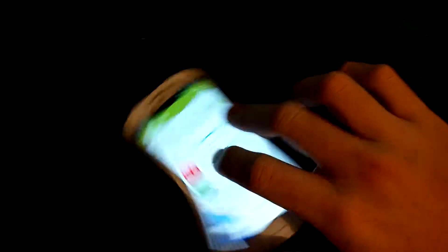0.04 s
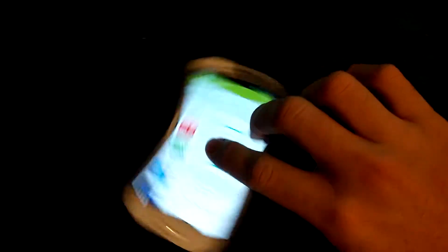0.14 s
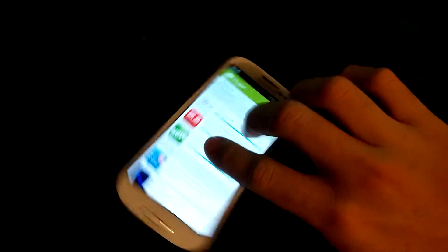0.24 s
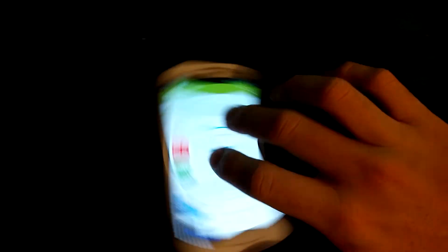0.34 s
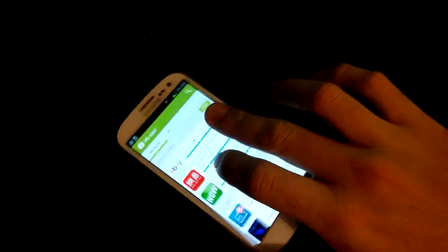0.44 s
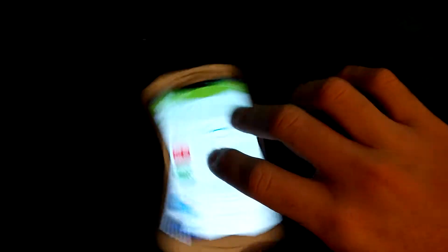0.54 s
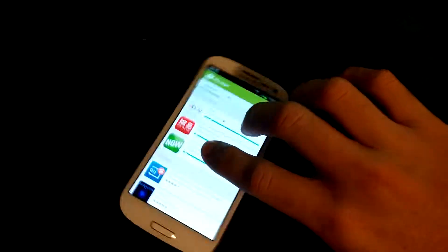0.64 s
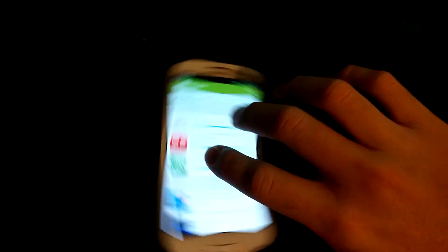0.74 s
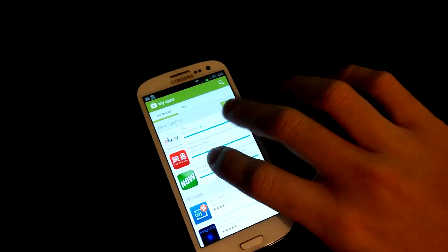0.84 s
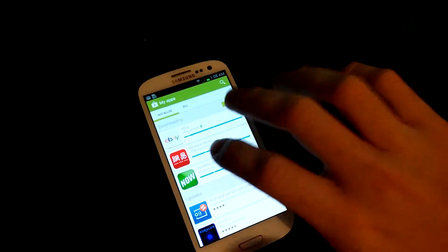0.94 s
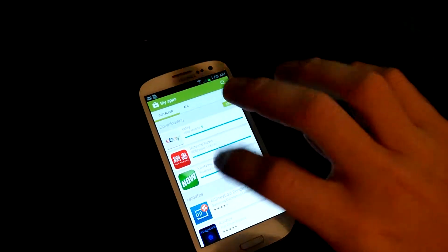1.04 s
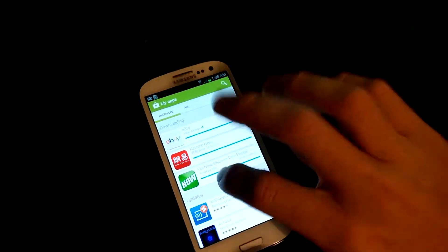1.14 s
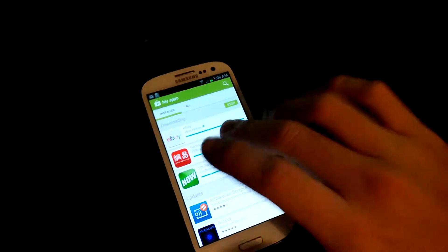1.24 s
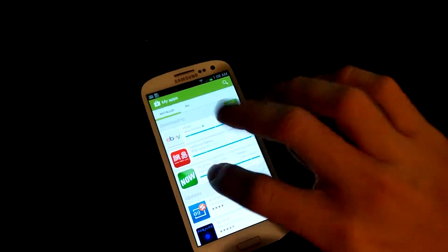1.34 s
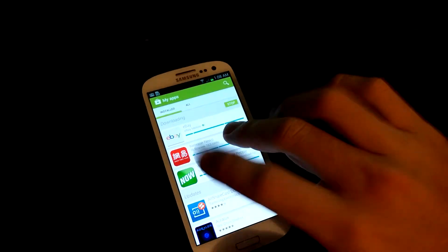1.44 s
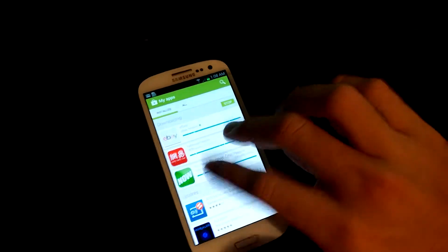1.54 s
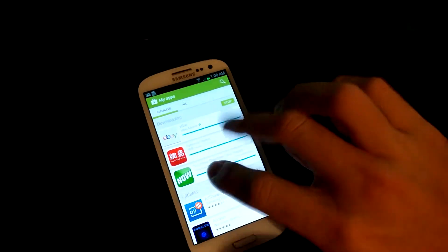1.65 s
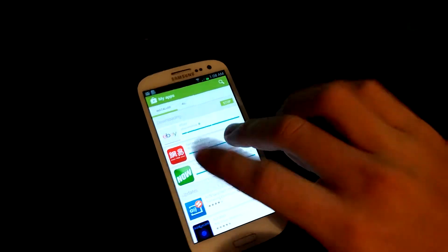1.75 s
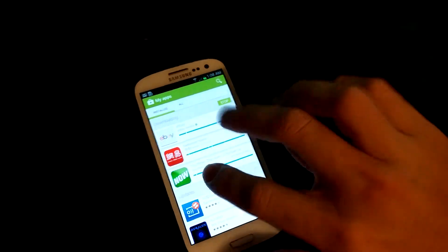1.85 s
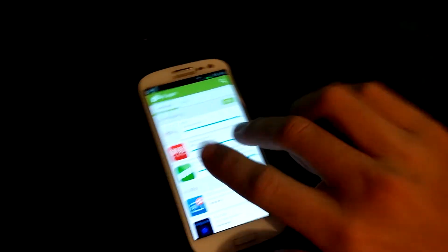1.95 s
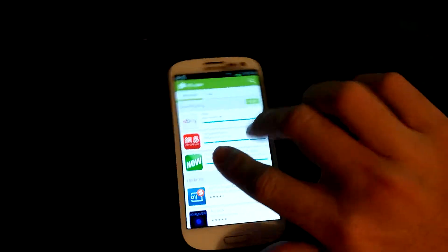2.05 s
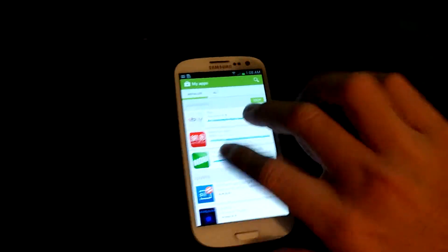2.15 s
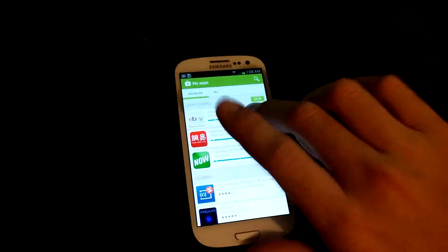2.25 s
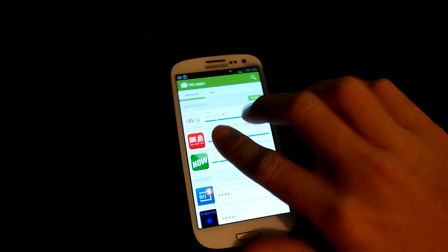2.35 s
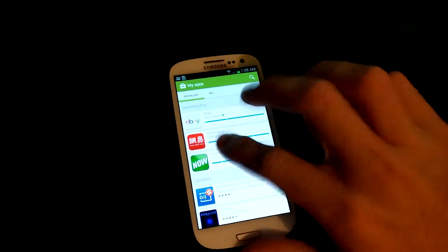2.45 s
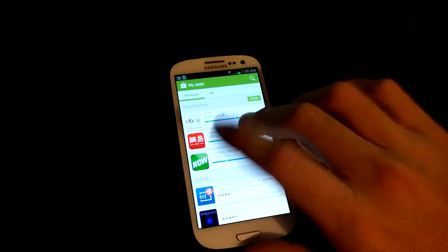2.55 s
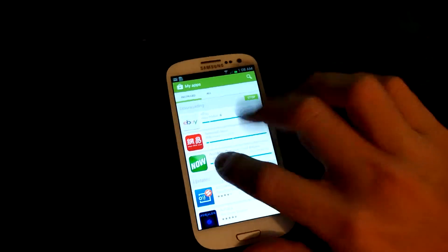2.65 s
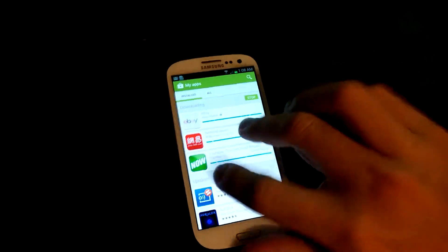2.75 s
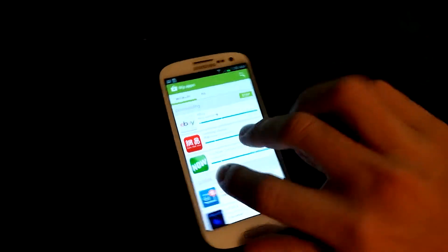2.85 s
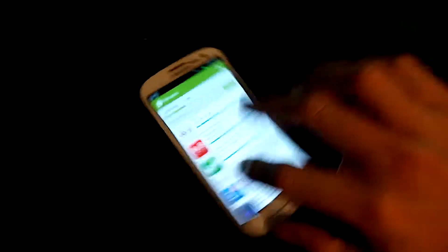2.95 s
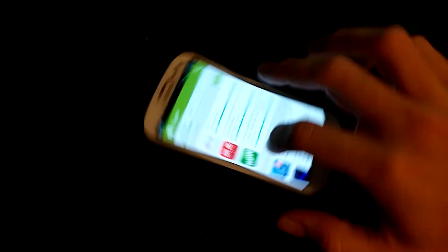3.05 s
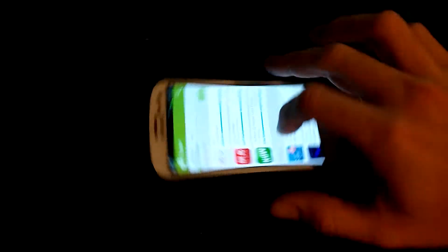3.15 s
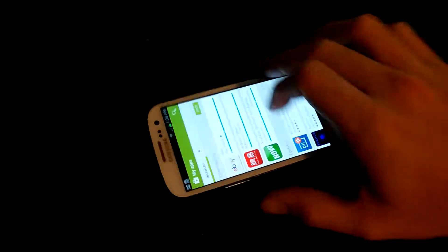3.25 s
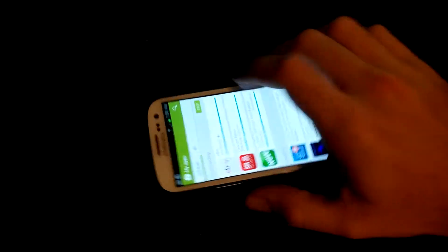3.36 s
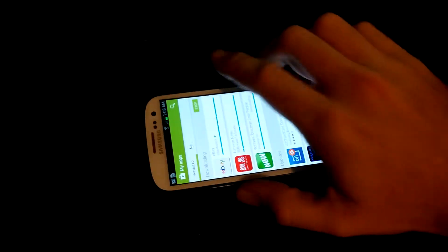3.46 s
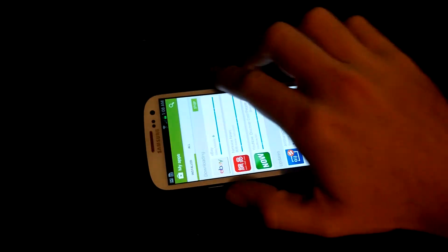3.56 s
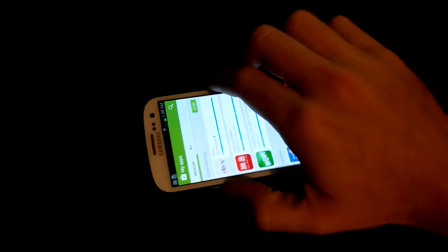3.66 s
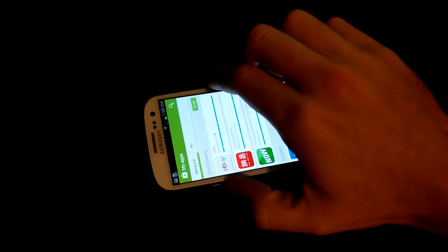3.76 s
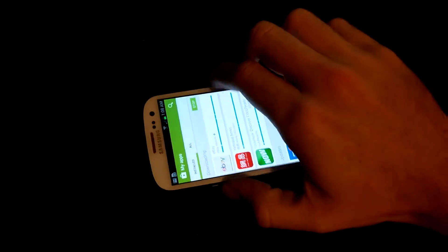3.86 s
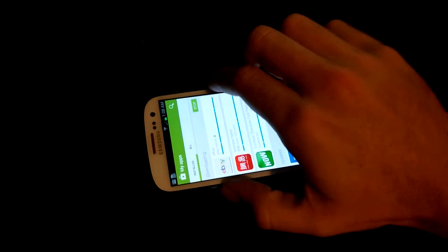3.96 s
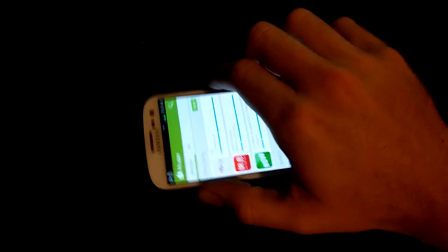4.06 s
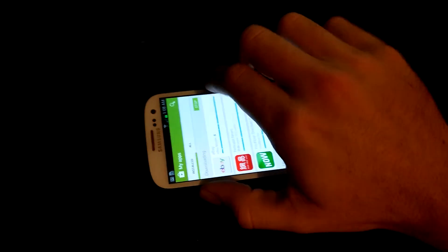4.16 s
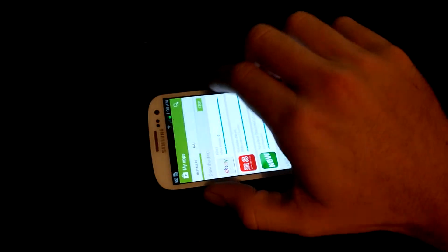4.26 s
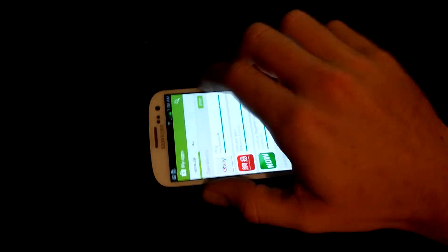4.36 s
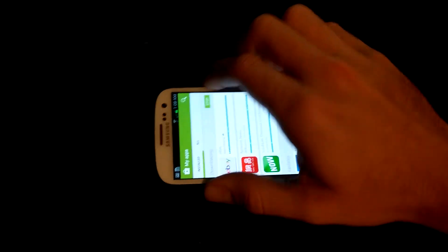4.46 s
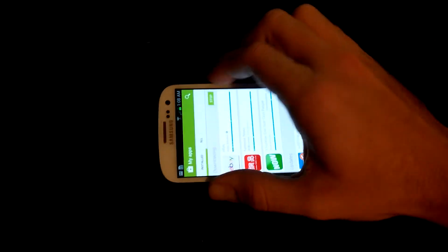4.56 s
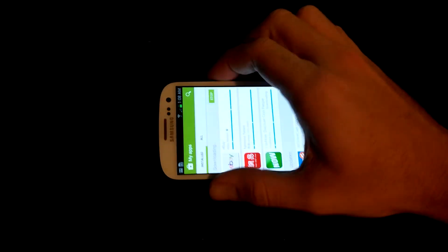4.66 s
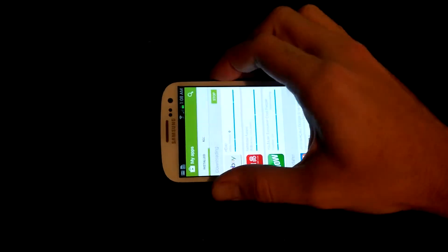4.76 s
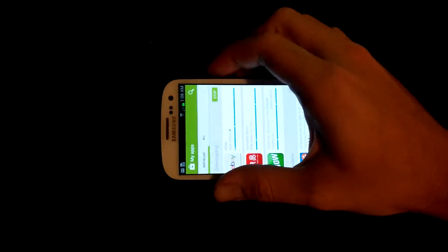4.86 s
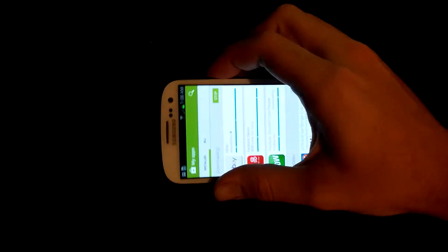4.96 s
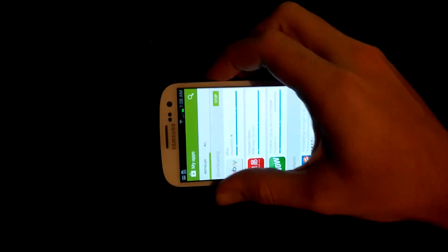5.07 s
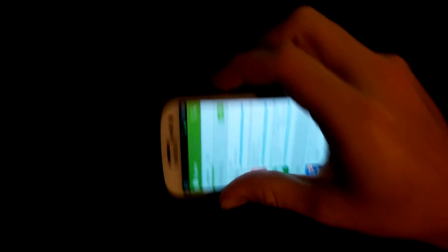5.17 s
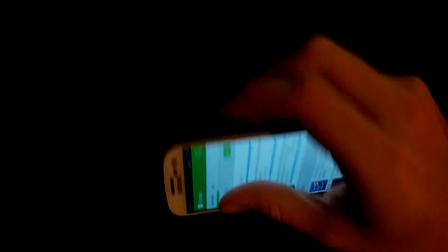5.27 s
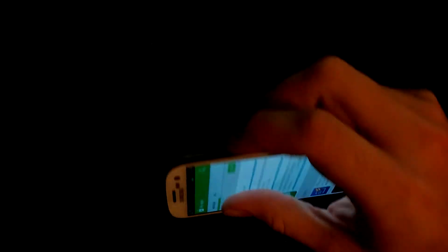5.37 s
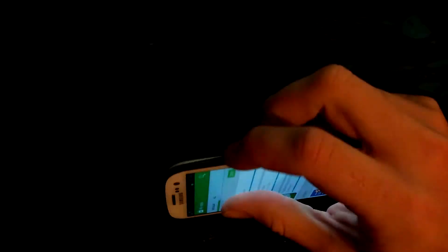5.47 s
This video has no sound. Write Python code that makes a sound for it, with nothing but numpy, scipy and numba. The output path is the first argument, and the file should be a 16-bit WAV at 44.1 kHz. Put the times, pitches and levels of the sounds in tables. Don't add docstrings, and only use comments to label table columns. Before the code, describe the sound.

Soft low bumps, then a burst of booming finger drumming with sharp nail cracks on glass, then quiet ticks and scrapes of a handled phone.

```python
import sys
import numpy as np
from scipy import signal
from scipy.fft import rfft, irfft
from scipy.io import wavfile
from scipy.ndimage import uniform_filter1d
from numba import njit

SR = 44100
rng = np.random.default_rng(int(sys.argv[2]) if len(sys.argv) > 2 else 0)


def level_to_linear(level):
    exponent = np.asarray(level, float) / 20
    return 10 ** exponent


def generate_wav(signal):
    frames = np.transpose(np.atleast_2d(signal))
    scaled = np.clip(frames, -1, 1) * 32767
    pcm = np.round(scaled).astype(np.int16)
    wavfile.write(sys.argv[1], SR, pcm)


N = 243873

# f/Hz, density [dB per Hz]
AIR_SPECTRUM = [(35, -38), (60, -17.5), (139, -10), (272, -10), (521, -20.5), (756, -18), (849, -19),
                (1350, -26), (2310, -32.5), (15500, -40.5)]
# f/Hz, width/Hz, level/dB
FAN_HUMPS = [(255, 40, 5), (357, 42, 6), (500, 27, 2.5), (740, 56, 1.5), (1160, 12, 5.5), (2400, 730, 5.5),
             (11200, 300, -1.5)]
# t/s, level/dB
RUMBLE = [
    (0.0, -36.5),
    (0.94, -47),
    (1.48, -34),
    (2.58, -51),
    (2.859, -27.5),
    (3.2, -92.5),
]
# t/s, length/s, peak level/dB, f/Hz, width/Hz
RUBS = [(.125, 0.11, -55.5, 950, 199), (0.119, 0.12, -55.5, 290, 120), (0.383, 0.036, -58, 720, 200),
        (0.528, .04, -54.5, 800, 250), (0.592, 0.068, -56, 870, 300), (0.691, 0.029, -58, 420, 250),
        (0.723, 0.064, -52.5, 450, 200), (0.878, 0.061, -54.5, 740, 120), (0.954, 0.07, -57, 655, 303),
        (1.017, 0.053, -51.5, 520, 300), (1.128, 0.12, -57.5, 765, 198), (1.421, 0.068, -61.5, 2780, 302),
        (1.569, 0.02, -41, 1400, 400), (1.629, 0.049, -63.5, 2500, 250), (1.824, 0.049, -49.5, 930, 152),
        (1.811, .05, -54, 2780, 250), (2.029, 0.027, -56, 850, 200), (2.093, 0.067, -54.5, 740, 100),
        (2.593, 0.087, -69, 2620, 500), (2.85, 0.05, -43.5, 642, 120), (2.852, 0.03, -33.5, 440, 150),
        (2.899, 0.093, -63, 2700, 500), (4.488, 0.12, -69, 1300, 706), (4.702, 0.073, -70.5, 2020, 900),
        (4.979, 0.13, -64.5, 2190, 704), (5.236, 0.15, -60.5, 1610, 500), (5.303, 0.085, -58, 5450, 910),
        (5.43, 0.15, -67.5, 2280, 393), (5.501, 0.015, -48, 3400, 453), (4.696, 0.0084, -60, 1980, 1400),
        (2.204, 0.16, -56.5, 434, 118), (4.692, .12, -59.5, 432, 200), (2.485, 0.1, -62, 900, 900),
        (0.128, .06, -65, 3050, 350), (.135, 0.079, -56.5, 4260, 400), (0.193, .1, -60, 600, 500),
        (0.301, 0.059, -69, 805, 500), (0.657, .04, -68, 700, 600), (0.741, .06, -68, 2000, 900),
        (.8, 0.078, -69, 500, 400), (5.342, 0.038, -49, 330, 120), (4.084, 0.034, -56, 300, 119),
        (1.28, 0.042, -48, 5700, 2500)]
# t/s, length/s, peak level/dB, low f/Hz, high f/Hz
SCRAPES = [
    (0.123, 0.11, -45.5, 2920, 4300),
    (0.47, 0.058, -48.5, 2890, 4740),
    (0.583, 0.098, -45.5, 2910, 4300),
    (1.273, 0.035, -41.5, 2750, 5500),
    (3.926, 0.03, -36.5, 2340, 5160),
    (4.145, 0.12, -58.5, 2300, 4940),
    (4.5, 0.062, -51, 2200, 4700),
    (4.782, 0.026, -54, 2580, 4700),
    (5.293, 0.13, -50.5, 2300, 5770),
]
# t/s, peak level/dB, f/Hz
SNAPS = [
    (1.29, -33.5, 7960),
    (1.3928, -42.5, 12100),
    (1.576, -45.5, 9000),
    (1.7313, -42, 9000),
    (1.902, -43.5, 8950),
    (1.9754, -44.5, 8000),
    (2.2397, -32, 8000),
    (2.253, -45.5, 8000),
    (2.6825, -44.5, 7920),
    (2.848, -41, 8080),
]
# t/s, peak level/dB, f/Hz, knock level/dB
ROLL = [(1.1947, -62.5, 2530, -8.5), (1.282, -43, 2605, -27.5), (1.2899, -13, 2700, -17.5),
        (1.3004, -28, 2250, -17), (1.3931, -25, 2940, -7.5), (1.3992, -36, 1960, -3),
        (1.4074, -40, 1820, 1.5), (1.474, -34, 2770, -13.5), (1.491, -32, 2000, -20),
        (1.576, -34, 2190, -2), (1.6444, -41, 1830, -6), (1.7313, -31.5, 4030, -0.5),
        (1.7374, -33.5, 2400, -22.5), (1.8208, -32.5, 2540, -18.5), (1.8494, -39, 2840, -3),
        (1.9024, -32, 2520, -6), (1.9066, -31.5, 1730, -29), (1.9244, -32.5, 1920, -16),
        (1.9744, -26.5, 2500, -24), (1.9844, -32.5, 2140, -7.5), (2.0393, -40.5, 3000, -1.5),
        (2.0767, -38.5, 4860, -23)]
# t/s, peak level/dB, f/Hz, knock level/dB
RAPS = [(2.24, -15.5, 2240, -8), (2.2446, -28.5, 3350, -23), (2.2552, -18, 2180, -14.5),
        (2.268, -28, 3250, -3), (2.283, -33, 2230, -9.5), (2.2931, -55.5, 2440, -7), (2.395, -36, 4300, -8),
        (2.591, -34.5, 2230, -3.5), (2.683, -28, 2070, -3.5), (2.688, -43.5, 1790, 6.5),
        (2.701, -36.5, 2120, -23.5), (2.723, -51, 2500, -22.5), (2.765, -31, 2600, -14),
        (2.772, -32.5, 1880, -21.5), (2.779, -33.5, 2090, -11.5), (2.7917, -34.5, 2950, -21.5),
        (2.848, -23.5, 1700, -31.5), (2.8514, -18.5, 1560, -4), (2.8677, -23.5, 2685, -20),
        (2.8818, -34.5, 2080, -18), (2.8944, -40.5, 2720, -6), (2.998, -39, 2700, -17)]
# t/s, peak level/dB, f/Hz, knock level/dB
TICKS = [(3.7354, -27, 2330, -22), (3.8663, -31, 2000, -51), (3.936, -31, 2270, -30),
         (3.9530, -30, 2450, -45), (4.0553, -29.5, 2100, -20), (4.149, -37, 4500, -26),
         (4.1884, -59, 2150, 11), (4.69, -40.5, 1860, -19), (4.788, -29, 4130, -42),
         (5.0305, -39, 4000, -11.5), (5.354, -36.5, 2320, -21), (0.128, -44, 2800, -10),
         (0.589, -39, 2760, -7), (1.026, -57, 1790, 1), (5.166, -61, 1500, 10), (5.428, -51, 1576, 5),
         (4.5086, -56, 2240, -17), (4.5226, -45, 4600, -4), (4.7286, -54, 1500, -4),
         (4.755, -67, 3170, -25), (4.984, -56.5, 1400, -6), (4.995, -48, 1880, -3.5),
         (5.3182, -43, 2150, -11),
         (3.931, -31, 6300, -29),
    (3.9395, -39, 2700, -16),
    (3.944, -38, 4900, -25),
    (4.690, -36, 2300, -17),
    (4.695, -43, 1540, -13),
    (4.091, -44, 2200, -13),
    (3.9528, -26, 2500, -30),
    (3.966, -39, 2900, -20),
    (2.7575, -41, 3000, -20),
]
# f/Hz, width/Hz, level/dB
CASE_MODES = [(960, 62, 10.5), (1400, 110, 15), (2130, 210, 4), (2750, 170, -9), (3250, 400, -42),
              (4300, 3000, 0.5)]
# f/Hz, level/dB, ring t60/s
TABLE_MODES = [(58.1, -4.5, 1), (77.4, 2.5, 0.11), (97.1, 1, 0.11), (135.55, -4.5, 0.19),
               (185.5, -3.5, 0.11), (214.2, -0.5, 0.19), (226, -2.5, 0.1), (256.9, -9, 0.14),
               (291.1, -6, 0.1), (367.5, -15.5, 0.089), (428.4, -7.5, 0.085), (647, -16, 0.071)]
# t/s, peak level/dB, boom f/Hz, ring t60/s, upper modes level/dB
LEANS = [
    (2.1, -32.5, 63.2, 0.16, 5),
    (2.419, -37, 60.4, 0.43, -6),
    (2.692, -34, 70, 0.18, -12),
    (2.86, -20.5, 70.7, 0.16, -14),
    (3.529, -81.5, 89.6, .2, -1),
    (4.43, -55, 62.4, 0.11, 17),
    (4.499, -47, 61.6, 0.22, -7),
    (5.166, -66, 72, 0.055, 9),
    (5.322, -52, 66.4, 0.2, -13),
]
# t/s, peak level/dB, boom f/Hz, ring t60/s, upper modes
# level/dB
MORE_THUDS = [(1.391, -19, 122, .05, 1), (1.1, -21, 170, .12, 7.5), (2.755, -19.5, 120, 0.078, 3.5),
              (2.79, -21, 122, 0.083, -6.5), (3.058, -32.5, 118, 0.061, 5), (3.17, -45.5, 136, 0.12, 4),
              (2.15, -35.5, 137.4, 0.106, 3), (4.468, -44, 80, 0.05, -13), (.378, -42.5, 136, 0.051, 1),
              (4.885, -57, 92, 0.048, 4), (.893, -37, 140, 0.043, 6), (.918, -41.5, 80, 0.082, -7),
              (1.025, -41, 110, .09, 4.5), (4.535, -39.5, 89, 0.058, 1), (1.4, -20, 110, 0.086, 4)]
# t/s, peak level/dB, boom f/Hz, ring t60/s, upper modes level/dB
TURNS = [(0.004, -44, 121, 0.072, 5.5), (.039, -53, 123.4, 0.16, 2), (0.073, -36.5, 120.2, 0.13, 0),
         (0.118, -36.5, 93.6, 0.25, 2), (.181, -45.5, 118.5, 0.075, 10), (.247, -41.5, 120, 0.089, 3),
         (0.281, -36, 127, 0.099, -1.5), (0.314, -32.5, 111.5, 0.11, -14), (0.376, -53, 125.7, 0.12, -3),
         (0.459, -39, 119.8, 0.08, -7), (0.532, -41, 96, 0.037, 7.5), (0.585, -38.5, 128, 0.16, -6),
         (0.612, -41, 108, 0.11, -5), (.689, -44.5, 132.2, 0.14, 9.5), (0.721, -40, 122.9, 0.19, 1),
         (0.76, -48, 112, 0.041, 1), (0.818, -50, 110, 0.32, 6), (.869, -35, 132.3, 0.14, -4),
         (0.955, -36.5, 130.9, 0.24, 4.5), (1.015, -39.5, 121.8, .21, 4), (1.114, -36, 116, 0.13, -2),
         (1.147, -37, 117.3, 0.15, 0)]
# t/s, peak level/dB, boom f/Hz, ring t60/s, upper modes level/dB
DRUMS = [(1.196, -21.5, 112.4, 0.2, -10.5), (1.281, -8.5, 116, 0.089, 2.5),
         (1.341, -25.5, 122.4, 0.078, 8.5), (1.399, -8, 122.6, 0.11, -2), (1.48, -13.5, 112, 0.06, 0.5),
         (1.577, -10, 122.7, 0.13, -3.5), (1.596, -18, 123, 0.082, -6), (1.645, -21.5, 121, 0.18, -3),
         (1.737, -10, 118.6, 0.11, 2.5), (1.822, -13, 119, 0.07, -2.5), (1.847, -19.5, 124, 0.068, 2.5),
         (1.907, -12, 123, 0.077, 1.5), (1.931, -18, 127.5, 0.097, -4.5), (1.975, -10.5, 123, 0.093, -7),
         (2.015, -21.5, 128, 0.09, -3), (2.043, -22.5, 140.4, 0.11, 6), (2.235, -15.5, 111.2, 0.17, 6),
         (2.258, -13.5, 124.3, 0.12, -6.5), (2.278, -16.5, 120.2, 0.089, -3), (2.4, -24, 125.7, 0.11, 0),
         (2.588, -15, 127, 0.1, -0.5), (2.685, -10, 107.8, 0.074, 0.5), (2.714, -24.5, 121, 0.095, 3),
         (2.763, -13, 120.5, .17, -4.5), (2.852, -7.5, 126.5, 0.11, 1), (2.874, -12, 133, 0.091, 2),
         (2.909, -21.5, 131.3, 0.16, -4), (2.993, -23.5, 114, 0.13, 5.5), (3.125, -40.5, 139.7, 0.28, -1)]
# t/s, peak level/dB, boom f/Hz, ring t60/s, upper modes level/dB
REACHES = [(3.336, -46, 137.8, 0.06, -1.5), (3.409, -59.5, 121, 0.075, 1), (3.575, -57.5, 120.5, 0.063, -9),
           (3.685, -52, 117.8, 0.041, 3), (3.734, -42, 98.6, 0.28, 14.5), (3.774, -49, 128, 0.079, 0),
           (3.859, -52.5, 112.3, 0.14, 1), (3.936, -39.5, 123.4, 0.43, 0), (3.99, -46, 124, 0.075, 14),
           (4.078, -36, 124.7, 0.093, 6.5), (4.140, -34, 100, 0.32, -6.5), (4.196, -34, 104.7, 0.16, -9.5),
           (4.269, -66, 141, 0.14, 1)]
# t/s, peak level/dB, boom f/Hz, ring t60/s, upper modes level/dB
GRIPS = [(4.342, -54, 111.8, 0.13, 8), (4.441, -58, 111.4, 0.05, 12), (4.477, -35.5, 71, 0.16, -3),
         (4.529, -41, 77, 0.18, 2), (4.57, -47.5, 115.5, 0.087, 0), (4.626, -66, 101.4, 0.048, 8),
         (4.689, -56.5, 106, 0.084, -3), (4.722, -46.5, 127.8, 0.29, 1), (4.792, -41.5, 128.5, 0.12, 14),
         (4.876, -52, 161, 0.075, 10), (4.947, -59, 123, 0.12, -1), (4.98, -39, 140.6, 0.22, -0.5),
         (5.054, -53.5, 85.5, 0.12, 2), (5.102, -38.5, 129.3, 0.088, 3), (5.154, -53, 160, 0.36, 4),
         (5.241, -40, 128.6, 0.18, 2), (5.296, -50.5, 152, 0.13, 2), (5.34, -40, 123, 0.3, -6.5),
         (5.424, -35, 94.7, 0.36, 0.5), (5.468, -42.5, 112.6, 0.32, -3.5)]
# f/Hz, lost below level/dB, lost above level/dB
LOST_BANDS = [(13000, -66, -14), (13700, -60, -20), (14300, -55, -26), (15000, -49, -30)]

AIR_DB, HISS_DB = -50, -83.5
SLIP_DB = 2.5
RISE_SHARE, START_DB, END_DB, HIGH_DB = 0.33, -9.5, -18.5, -6
MIDDLING_DB = -39.5
DEEP, UPPER = (-20, 0.13), (-11, 0.28)
DRUM_UPPER = (-24.5, 0.33)
EDGE, FIZZ = (-29.5, 0.11), (-17.5, -0.39)
GRIP_S = 3.3
TICK_EDGE_DB, TICK_FIZZ_DB, TICK_CASE_DB = -16, -3, -6
DULL = 2.4
LEAD_S = 0.007
DETUNE = 0.012
AWAY_DB_PER_OCTAVE = -3
UPPER_LATE_S, UPPER_SWELL_S = 0.0036, 0.0057
DAMPING = 1.46
ROOM_T60_S, ROOM_DB, BOOM_ROOM_DB = 0.84, -8, -15.5
SPREAD_DB, SPREAD_HZ = -11, 330
PORT_LAG_S, LEFT_DB = 0.0004, 5.5
SLOPE, KNEE_DB, STILL_DB = 1.8, -40, -57
OPEN_S, CLOSE_S = 0.0022, 0.008
LOW_CUT_HZ, TOP_HZ = 53, 15650
OFFSET = -0.00013
MOOD_DB, SNAP_PASS_DB = 4, -60


def noise(*shape):
    return rng.standard_normal(shape)


def band(x, hz, width):
    return signal.lfilter(*signal.iirpeak(hz, hz / width, SR), x)


def unit(x):
    return x / np.sqrt(np.mean(x ** 2))


def add(out, s, x):
    i = max(int(s * SR), 0)
    n = min(x.shape[-1], N - i)
    out[..., i:i + n] += x[..., :n]


def share(law, db):
    return law[0] + law[1] * (db - MIDDLING_DB)


def lost_db(heard_db):
    return SLOPE / (1 + SLOPE) * np.maximum(KNEE_DB - heard_db, 0)


def lost_at(s):
    rows = np.array(TURNS + DRUMS + REACHES + GRIPS)
    return np.interp(s, rows[:, 0], lost_db(rows[:, 1] - 4))


def air():
    f = np.maximum(np.fft.rfftfreq(N, 1 / SR), 1)
    humps_db = sum(db / (1 + (2 * (f - hz) / width) ** 2) for hz, width, db in FAN_HUMPS)
    hz, db = np.array(AIR_SPECTRUM).T
    shape = level_to_linear(humps_db + np.interp(np.log(f), np.log(hz), db))
    mid, left, right = rfft(noise(3, N))
    apart = np.clip(f / 800, 0, 1)
    both = shape * (np.sqrt(1 - apart ** 2) * mid + apart * np.array([left, right]))
    return unit(irfft(both, N)) * level_to_linear(AIR_DB + np.array([[2.3], [-2.7]]))


def rumble():
    s, db = np.transpose(RUMBLE)
    soft = signal.sosfilt(signal.butter(3, 450, fs=SR, output="sos"), noise(N))
    slips = soft * level_to_linear(SLIP_DB * unit(uniform_filter1d(noise(N), size=900)))
    modes = TABLE_MODES + [(123.0, 8, 0.25)]
    hum = sum(level_to_linear(d) * unit(band(slips, f, 3.8 / t60)) for f, d, t60 in modes)
    return unit(hum) * level_to_linear(np.interp(np.arange(N) / SR, s, db + lost_db(db) - 10.5, right=-90))


def rubs():
    out = np.zeros((2, N))
    for s, length, db, hz, width in RUBS:
        t = np.arange(0, length, 1 / SR)
        strength = level_to_linear(2.5 * rng.exponential(size=120).repeat(60))
        a, b = (noise(2, 7200) * strength)[:, :len(t)]
        ports = np.array([a, 0.8 * a + b])
        rub = unit(band(band(ports, hz, width), hz, 2 * width))
        swell = np.sin(np.pi * (t / length) ** 0.37)
        add(out, s, rub * swell * level_to_linear(db + lost_at(s + t)))
    return out * level_to_linear(np.array([[3.5], [-4.5]]))


def scrapes():
    out = np.zeros((2, N))
    for s, length, db, low_hz, high_hz in SCRAPES:
        t = np.arange(0, length, 1 / SR)
        strength = level_to_linear(1.7 * rng.exponential(size=300).repeat(20))
        grains = (noise(2, 6000) * strength)[:, :len(t)]
        resonances = [(low_hz, 480), (high_hz, 1200), (900, 800)]
        low, high, body = (unit(band(band(grains, hz, w), hz, 2 * w)) for hz, w in resonances)
        edge = np.clip(np.minimum(t, length - t) / 0.0019, 0, 1)
        swell_db = np.interp(t / length, [0, RISE_SHARE, 1], [START_DB, 0, END_DB])
        level = level_to_linear(db + swell_db + lost_at(s + t) - 7.5)
        add(out, s, edge * level * (low + level_to_linear(HIGH_DB) * high + level_to_linear(-7.5) * body))
    return out * level_to_linear(np.array([[4.0], [-6.0]]))


def snaps():
    out, t = np.zeros((2, N)), np.arange(900) / SR
    for (s, db, hz), (a, b) in zip(SNAPS, noise(len(SNAPS), 2, len(t))):
        crackle = np.array([a, 0.6 * a + 0.55 * b]) * np.exp(-t / 0.003)
        snap = band(crackle, hz, 2.0 * hz)
        add(out, s, snap / np.abs(snap[0]).max() * level_to_linear(db))
    return out


def clicks(rows):
    out, t = np.zeros((2, N)), np.arange(2000) / SR
    chance = noise(len(rows), 3, len(t))
    for (s, peak_db, hz, knock_db), (near, weights, other) in zip(rows, chance):
        held = s > GRIP_S
        fizz = level_to_linear(share(FIZZ, peak_db) + TICK_FIZZ_DB * held) * np.exp(-t / 0.013)
        envelope = (np.exp(-t / 0.00045) + fizz) * np.minimum(t / 0.00051, 1)
        crack = np.array([near, 0.47 * near + 0.81 * other]) * envelope
        case = sum(level_to_linear(db + 1.2 * dice) * band(crack, f, w)
                   for (f, w, db), dice in zip(CASE_MODES, weights))
        wide = max(0.6 * hz, 600)
        centre = band(band(crack, hz, wide), hz, 2 * wide)
        ring = band(case, 4600, 6000)
        knock = band(band(crack, 1100, 890), 1000, 700)
        edge = band(band(crack, 5600, 2300), 5500, 4400)
        dull = signal.butter(2, min(DULL * hz, 6500), fs=SR)
        parts = [signal.lfilter(*dull, p) for p in (centre, ring, knock)] + [edge]
        edge_db = share(EDGE, peak_db) + TICK_EDGE_DB * held
        levels_db = [(-2, -17), (-5.5 + TICK_CASE_DB * held, -19),
                     (knock_db + 5.5, knock_db - 6.5), (edge_db, edge_db - 1.0)]
        for part, db in zip(parts, levels_db):
            level = level_to_linear(np.array(db)[:, None] + peak_db + lost_at(s))
            add(out, s, part / np.abs(part[0]).max() * level)
    return out


def thuds(rows):
    out, t = np.zeros(N), np.arange(SR // 2) / SR
    hz, db, t60 = np.array(TABLE_MODES).T[:, :, None]
    deep, upper = hz < 70, hz > 180
    chance = noise(len(rows), 2, len(TABLE_MODES), 1)
    for (s, peak_db, boom_hz, ring, upper_db), (spot, detune) in zip(rows, chance):
        law = DRUM_UPPER if peak_db > MIDDLING_DB + 6 else UPPER
        deep_share = share(DEEP, peak_db) - 5.0
        upper_share = share(law, peak_db) + upper_db + 6.5
        near_share = -2.5 + AWAY_DB_PER_OCTAVE * np.abs(np.log2(hz / boom_hz))
        group_db = np.where(deep, deep_share, np.where(upper, upper_share, near_share))
        decay = level_to_linear(db + group_db + 3.5 * spot - 60 * t / (t60 * ring / 0.2))
        modes = decay * np.sin(2 * np.pi * hz * (1 + DETUNE * detune) * t)
        choke = level_to_linear(-60 * (t / max(0.76 * ring, 0.025)) ** DAMPING)
        boom = choke * np.sin(2 * np.pi * boom_hz * t)
        late = np.maximum(t - UPPER_LATE_S, 0) / UPPER_SWELL_S
        swell = (1 - np.exp(-np.where(upper, late, t / 0.012))) ** 2
        x = ((modes * swell).sum(axis=0) - boom * swell[0]) * np.cos(np.pi * t) ** 2
        add(out, s - LEAD_S, x / np.abs(x).max() * level_to_linear(peak_db + lost_db(peak_db - 2.0)))
    return out


def room(x, t60, dull_hz):
    t = np.arange(SR // 2) / SR
    low = signal.lfilter(*signal.butter(1, dull_hz, fs=SR), noise(2, len(t)))
    tail = low * level_to_linear(-60 * t / t60) + 2.0 * noise(2, len(t)) * level_to_linear(-60 * t / (0.62 * t60))
    tail = tail * np.minimum(t / 0.0095, 1)
    return signal.fftconvolve(x[None], tail / np.sqrt(np.sum(tail ** 2) / 2), axes=1)[:, :N]


@njit
def follow(x, up, down):
    e, y = 1e-5, np.empty(len(x))
    for i in range(len(x)):
        e += (x[i] - e) * (up if x[i] > e else down)
        y[i] = e
    return y


def expander(events):
    power = uniform_filter1d(events ** 2, size=600, origin=60)
    memory = level_to_linear(-71.0) * follow(power, 1 / (OPEN_S * SR), 1 / (0.06 * SR))
    present = follow(power, 1 / (OPEN_S * SR), 1 / (CLOSE_S * SR))
    level_db = 10 * np.log10(present + memory + level_to_linear(2 * STILL_DB))
    return level_to_linear(-SLOPE * np.maximum(KNEE_DB - level_db, 0))


def scene():
    lean = level_to_linear(np.array([[LEFT_DB], [-LEFT_DB]]) / 2)
    boom = thuds(TURNS + DRUMS + REACHES + GRIPS + LEANS)
    tail = room(boom, ROOM_T60_S, 180)
    table = boom + rumble() + level_to_linear(BOOM_ROOM_DB) * tail[0]
    short_waves = signal.butter(2, SPREAD_HZ, "high", fs=SR, output="sos")
    apart = signal.sosfilt(short_waves, np.roll(boom, int(0.002 * SR)) + 0.64 * tail[1])
    table = table + level_to_linear(SPREAD_DB) * apart * np.array([[1], [-1]])
    table = table + thuds(MORE_THUDS)
    bright = clicks(ROLL + RAPS + TICKS) + scrapes() + rubs() + snaps()
    bright = np.array([bright[0], np.roll(bright[1], int(PORT_LAG_S * SR))])
    sent = signal.lfilter([1, -0.6], 1, bright.mean(axis=0)) * level_to_linear(4.0)
    events = lean * (table + level_to_linear(ROOM_DB) * room(sent, ROOM_T60_S, 5200)) + bright
    low_cut = signal.butter(7, LOW_CUT_HZ, "high", fs=SR, output="sos")
    events, hum = signal.sosfilt(low_cut, [events, air()])
    return (events + hum) * expander(events.mean(axis=0))


def top_cut(x):
    return signal.sosfilt(signal.butter(12, 16480, fs=SR, output="sos"), x)


def record(dry):
    dry = dry + level_to_linear(HISS_DB) * noise(2, N)
    level_db = 10 * np.log10(uniform_filter1d(dry.mean(axis=0) ** 2, size=3072) + 1e-12)
    for hz, faint_db, loud_db in LOST_BANDS:
        high_pass = signal.ellip(6, 0.1, 50, hz, "high", fs=SR, output="sos")
        edge = signal.sosfiltfilt(high_pass, dry)
        mood_db = level_db + MOOD_DB * noise(N // 1024 + 1).repeat(1024)[:N]
        snap = uniform_filter1d(edge[0] ** 2, size=400) > level_to_linear(2 * SNAP_PASS_DB)
        lost = (mood_db < faint_db) | ((mood_db > loud_db) & ~snap)
        dry = dry - edge * uniform_filter1d(1.0 * lost, size=512)
    low_pass = signal.ellip(10, 0.2, 70, TOP_HZ, fs=SR, output="sos")
    mix = signal.sosfilt(low_pass, dry) + OFFSET
    return top_cut(mix)


dry = scene()
out = record(dry)
generate_wav(out)
```